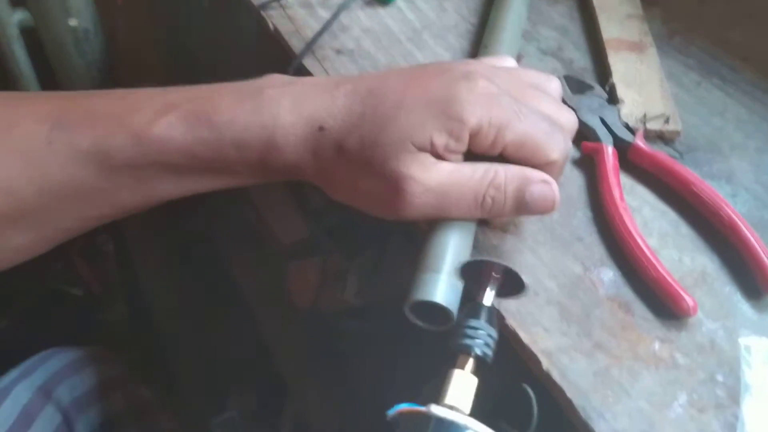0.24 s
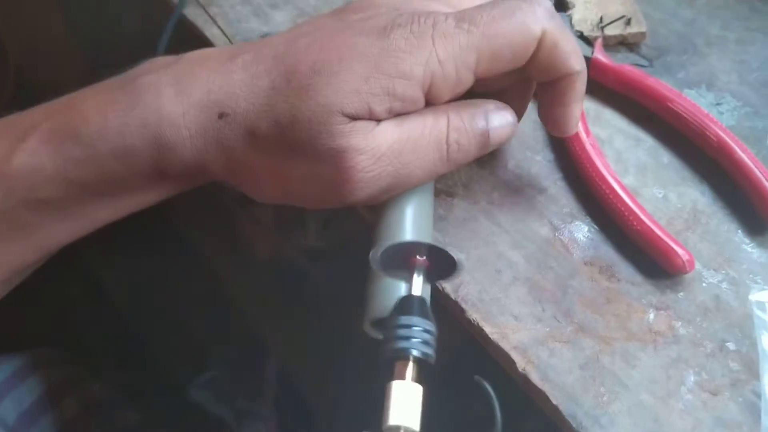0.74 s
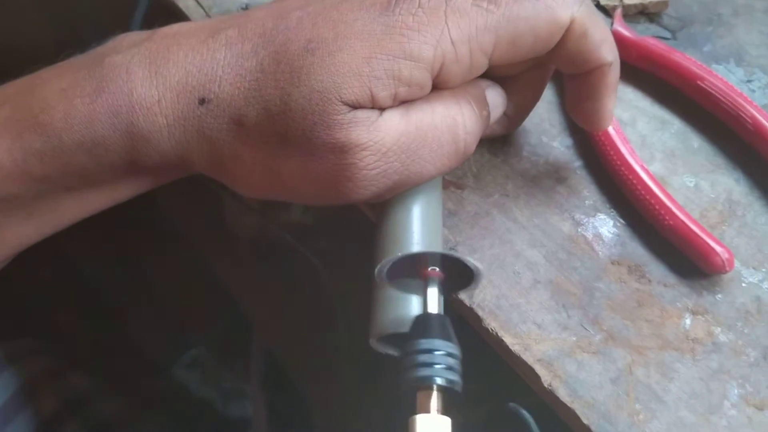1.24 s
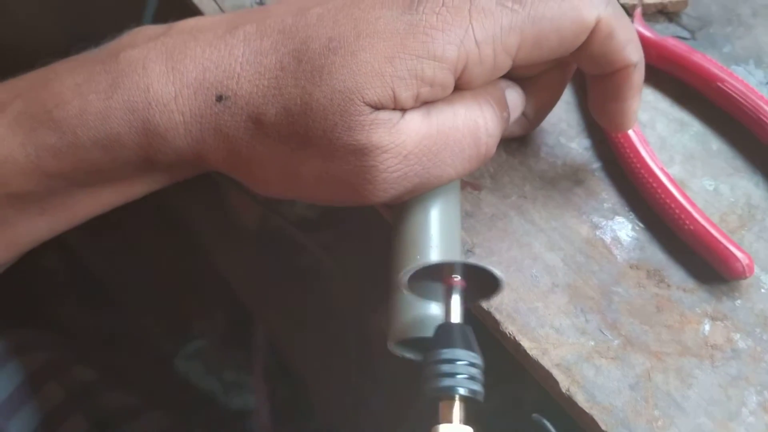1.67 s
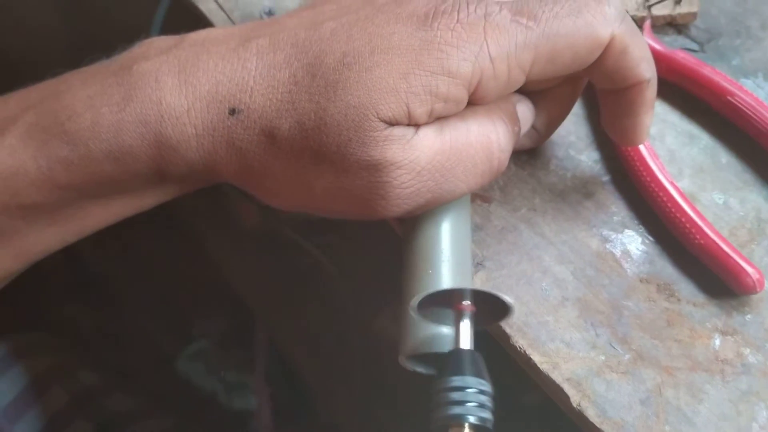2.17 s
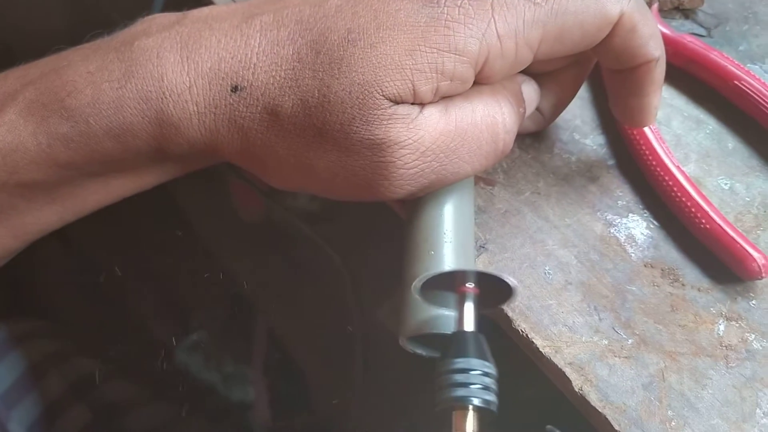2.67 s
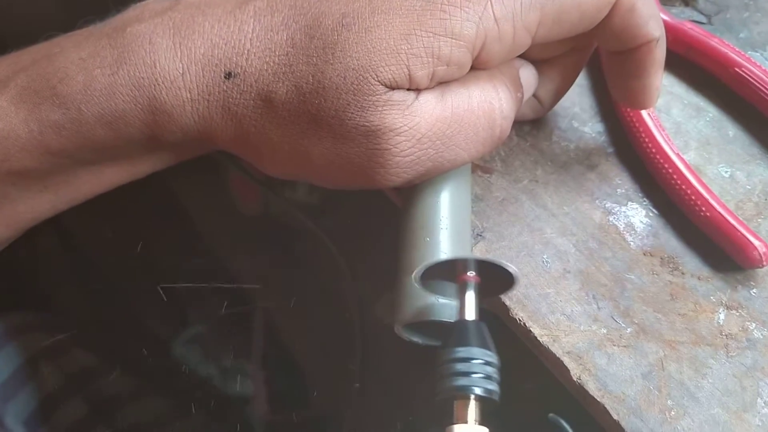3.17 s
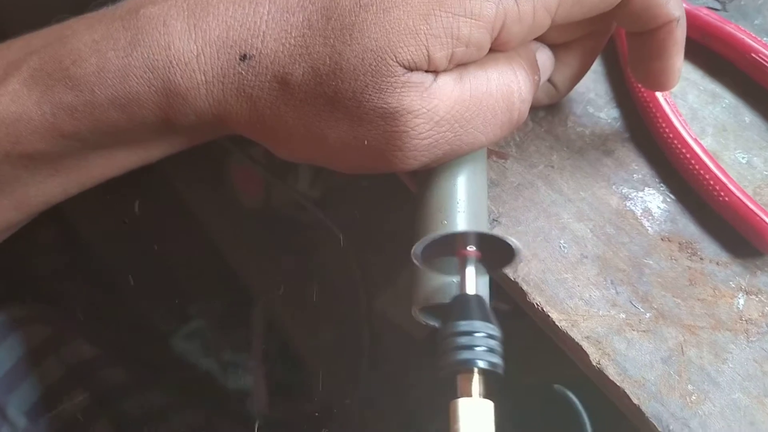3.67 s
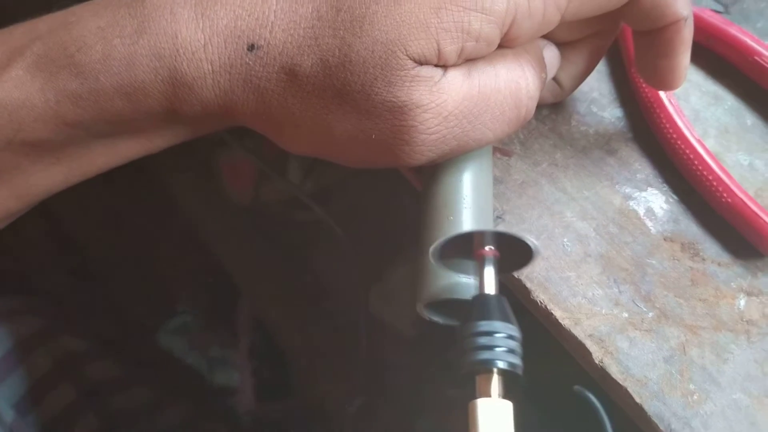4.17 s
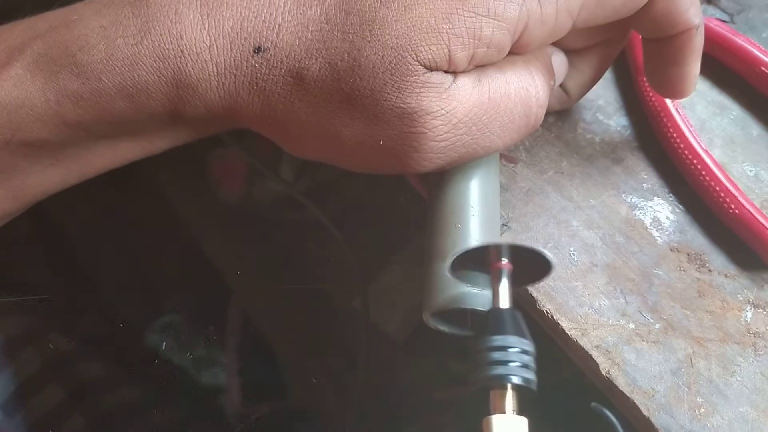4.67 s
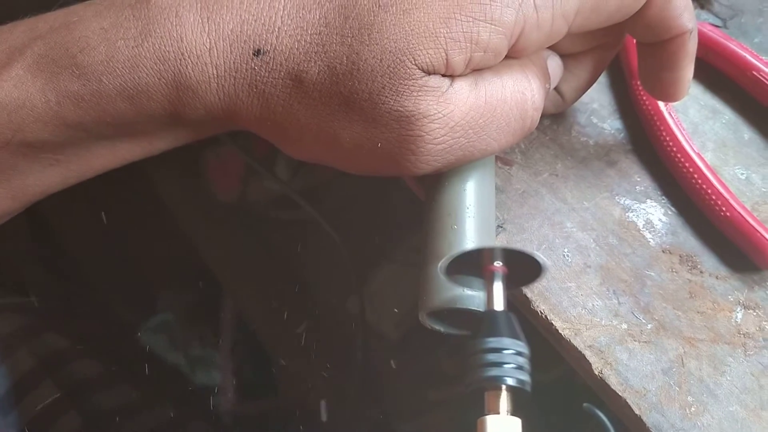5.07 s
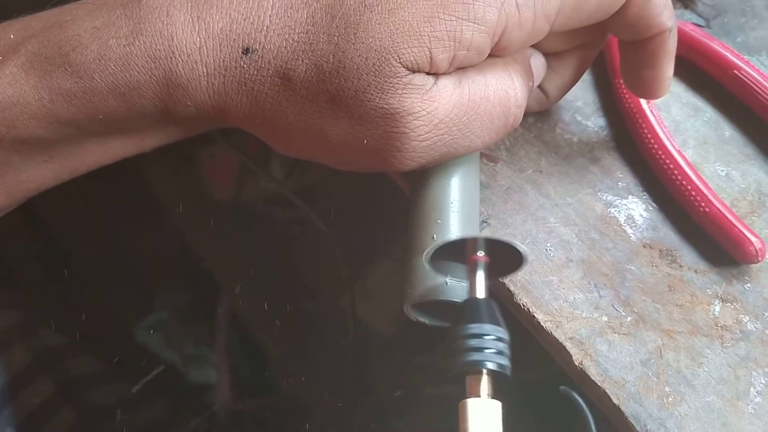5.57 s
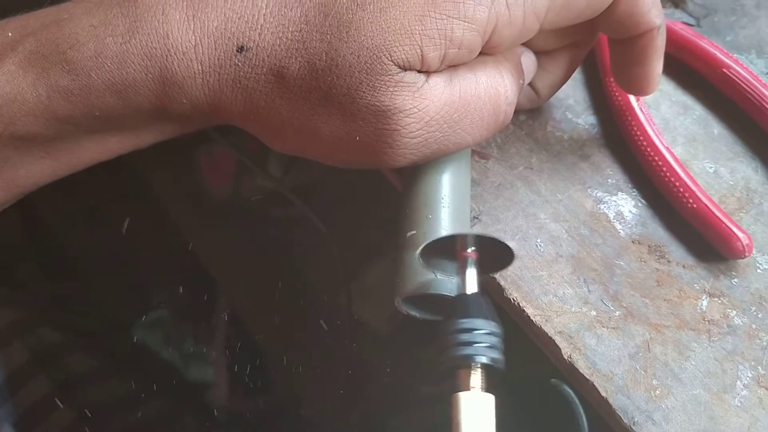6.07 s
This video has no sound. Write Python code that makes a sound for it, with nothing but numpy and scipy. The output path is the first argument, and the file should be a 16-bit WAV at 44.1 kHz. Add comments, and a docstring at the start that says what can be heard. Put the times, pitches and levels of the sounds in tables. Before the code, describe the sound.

A hand-held miniature cutter whirs close to the microphone, hissy and shrill, while a few soft thuds and a sharp tick come from the workbench area. The disc grazes the pipe once, then digs in: rapid once-per-turn strikes fuse into a harsh metallic buzz with a hollow plastic growl. The motor slows and the bites break up. A short free whine follows, then a second rough cut, with short room echo.

```python
"""Steel disc biting a plastic pipe

A small motor spins a thin steel disc that runs out of true, so it bites a plastic pipe once a turn.
Each bite is a sudden strike and a noisy scrape that ring the disc, the shank and the pipe.
The shaft turns slower under load, and on some turns the disc bounces clear.
Between cuts the motor whines freely: steady tones, a rattle and brush hiss.
A hand knocks on the bench of a small workshop, with a low shudder, a lone tick and a faint far tone."""
import sys
import numpy as np
from scipy import signal
from scipy.fft import rfft, irfft, next_fast_len
from scipy.io import wavfile
from scipy.ndimage import uniform_filter1d, minimum_filter1d, map_coordinates

SR = 44100
rng = np.random.default_rng(int(sys.argv[2]) if len(sys.argv) > 2 else 0)


def gain_from_decibels(decibels):
    """Convert decibel values to linear amplitude factors."""
    exponent = np.asarray(decibels, float) / 20
    return 10 ** exponent


def put_to_file(sound):
    """Save the sound as 16-bit audio at rate SR, in the file named by the first command-line argument."""
    columns = np.atleast_2d(sound).T  # one column per channel
    safe = np.clip(columns, -1, 1)
    whole_steps = np.round(safe * 32767)
    wavfile.write(sys.argv[1], SR, whole_steps.astype(np.int16))


N = 279153
T = np.arange(N) / SR  # time in seconds

# shaft speed, lower under load: time_s, speed_turns_per_s
SPEED = [(0.0, 74.79), (2.096, 74.81), (2.499, 72.76), (2.629, 67.09), (2.746, 67.53), (3.131, 55.75),
         (3.256, 43.16), (3.348, 54.66), (3.511, 42.13), (3.581, 63.6), (3.783, 75.34), (4.5, 73.65),
         (4.635, 65.49), (4.729, 65.21), (4.99, 57.5), (5.379, 56.09), (5.451, 68.49), (5.795, 45.65),
         (5.882, 57.46), (6.064, 49.47), (6.159, 62.56), (6.33, 36.03)]
# disc held against the pipe: start_s, end_s
CUTS = [(2.29, 3.725), (4.205, 6.4)]
RUB_DB = -21  # the rest of the rim rubs lightly
RASP_DB = -12  # steady rasp of the rim, felt by shank and pipe


def unit(x):
    """Brings a signal to rms 1."""
    return x / np.sqrt(np.mean(x ** 2) + 1e-20)


def along(points, hz):
    """Reads a curve of (Hz, value) points on a log frequency axis."""
    f, value = np.transpose(points)
    return np.interp(np.log(hz + 1), np.log(f + 1), value)


def wobble(rate):
    """A smooth random curve with rate knots a second."""
    knots = rng.standard_normal(int(N * 2000 / SR))
    return map_coordinates(knots, [T * rate])


def filtered(x, response):
    """Multiplies the spectrum of x by a complex response of frequency."""
    m = next_fast_len(N + SR // 2)
    return irfft(rfft(x, m) * response(np.fft.rfftfreq(m, 1 / SR)), m)[..., :N]


def resonance(f, k, centre_hz, width_hz, db):
    """One resonance peak; neighbours in the list have opposite signs."""
    damping = 1j * f * width_hz
    return (-1) ** k * gain_from_decibels(db) * damping / (centre_hz * centre_hz - f * f + damping)


def ring(x, modes, turn, spread_db, lean_db=0, drift_db=0):
    """Rings x through resonances; each turn drives each one at a new strength, which also drifts."""
    hz, m = np.linspace(0, SR / 2, 4096), next_fast_len(N + SR // 2)
    power = np.mean(abs(sum(resonance(hz, k, *mode) for k, mode in enumerate(modes))) ** 2)
    luck = rng.standard_normal((2, len(modes), turn.max() + 1))
    drift = unit(uniform_filter1d(luck[1], size=15))
    gains = gain_from_decibels(spread_db * luck[0] + drift_db * drift + lean_db)
    f = np.fft.rfftfreq(m, 1 / SR)
    spectrum = sum(rfft(x * gains[k][turn], m) * resonance(f, k, *mode) for k, mode in enumerate(modes))
    return irfft(spectrum, m)[:N] / np.sqrt(power)


def place(x, left_db, lag_s):
    """Pans a source: left is left_db louder than right and hears it lag_s later."""
    gain = gain_from_decibels([[left_db / 2], [-left_db / 2]])
    sides = np.array([[1], [-1]])
    return filtered(x, lambda f: gain * np.exp(-1j * np.pi * f * lag_s * sides))


def air():
    """Workshop background and a lumpy low shudder, both made of noise partly shared by the two sides."""
    # background colour: pitch_hz, relative level_db per Hz
    floor_colour = [(15, -38), (25, -2), (277, -9), (485, -15.5), (1040, -16.5), (1120, -15), (1320, -20),
                    (1460, -21), (2050, -16.5), (3000, -20), (3900, -27), (6600, -120)]
    # moments when the shudder swells into a low thump: time_s, relative level_db
    thumps = [(1.02, -50), (3.0, -50), (3.63, -39), (4.93, -41), (5.48, -37), (6.01, -48)]
    idle_db, cut_db, thump_s = -61, -53, 0.027

    def noise(apart):
        return rng.standard_normal(N) + apart * rng.standard_normal((2, N))

    def low_band(f):
        return (f / 25) ** 2 / (1 + (f / 25) ** 2) / (1 + (f / 70) ** 2)

    floor = gain_from_decibels(-56.5) * unit(filtered(noise(1.0), lambda f: gain_from_decibels(along(floor_colour, f))))
    shudder = unit(filtered(noise(0.48) * gain_from_decibels(1.5 * wobble(14)), low_band))
    busy = sum((T > start) & (T < end) for start, end in CUTS) * 1.0
    busy = uniform_filter1d(busy, size=SR // 5)
    level = gain_from_decibels(idle_db + (cut_db - idle_db) * busy + 1.9 * wobble(7))
    level += sum(gain_from_decibels(db) * np.exp(-((T - s) / thump_s) ** 2) for s, db in thumps)
    return floor + level * shudder * gain_from_decibels([[1.5], [-1.5]])


def room(x):
    """Workshop echo: noise tails whose pitches die at their own speeds, new every third of a second."""
    # how long the echo lasts: pitch_hz, fall by 60 dB_s
    decay = [(200, 0.38), (2000, 0.39), (9000, 0.16)]
    out, step = np.zeros((2, N + 2 * SR)), SR // 3
    for start in range(0, N, step):
        hz, t, z = signal.stft(rng.standard_normal((2, SR // 2)), SR, nperseg=256)
        fading = z * gain_from_decibels(-60 * t / along(decay, hz)[:, None])
        tail = signal.istft(fading, SR, nperseg=256)[1]
        bass = signal.lfilter(*signal.butter(1, 700, fs=SR), tail)
        tail += 0.44 * (bass[::-1] - bass) / 2  # long waves reach both sides more alike
        wet = signal.fftconvolve(x[None, start:start + step], tail / np.linalg.norm(tail[0]), axes=1)
        late = start + 200  # samples
        out[:, late:late + wet.shape[1]] += wet
    return out[:, :N]


def hoot():
    """A faint far tone: one sine whose pitch and level glide from point to point."""
    # time_s, pitch_hz, level_db
    glide = [(3.95, 680, -67), (4.005, 692, -58), (4.01, 791, -52), (4.08, 770, -55), (4.09, 670, -53),
             (4.11, 673, -62), (4.19, 714, -59)]
    s, hz, db = np.transpose(glide)
    level = gain_from_decibels(np.interp(T, s, db, left=-120, right=-120))
    return level * np.sin(2 * np.pi * np.cumsum(np.interp(T, s, hz)) / SR)


def knocks():
    """Dull knocks of hand and pipe on the bench: a sagging thud, its rough body and a short click."""
    # time_s, relative level_db, middle pitch_hz, relative click_db, fall by 60 dB_s
    knock_list = [(0.047, -36.5, 370, -16, 0.32), (0.081, -36, 338, -4, 0.088), (0.473, -44, 330, 4, 0.076),
                  (0.651, -32.5, 753, -8, 0.1), (0.913, -46, 425, -20, 0.27), (.995, -36, 212, 2, 0.11),
                  (1.68, -50, 330, -20, 0.073)]
    out, t = np.zeros(N + SR), np.arange(SR // 4) / SR
    for s, db, hz, click_db, t60 in knock_list:
        noise = rng.standard_normal((2, len(t)))
        # the pitch sags from 1.28 to 0.78 of hz
        thud = np.sin(2 * np.pi * hz * (0.78 * t + 0.0139 * (1 - np.exp(-t / 0.0278))))
        body = signal.lfilter(*signal.butter(1, [hz / 1.27, hz * 1.11], "band", fs=SR), noise[0])
        click = signal.lfilter(*signal.butter(2, [1900, 3100], "band", fs=SR), noise[1])
        blow = 0.51 * thud + 1.03 * unit(body) + gain_from_decibels(click_db + 1.5 - 500 * t) * unit(click)
        swell = 1 - np.exp(-t / 0.0014)
        out[round(s * SR):][:len(t)] += gain_from_decibels(db - 1.5 - 60 * t / t60) * swell * blow
    return out[:N]


def tick():
    """One sharp bright tick of the disc while the tool idles: sines that die within milliseconds."""
    # time_s, fall by 60 dB_s, list of (pitch_hz, relative level_db)
    tick_tones = (0.561, 0.009, [(9200, -25), (7000, -31)])
    s, t60, tones = tick_tones
    t = np.clip(T - s, 0, 1)
    return sum(gain_from_decibels(db - 60 * t / t60) * np.sin(2 * np.pi * hz * t) for hz, db in tones)


def shaft():
    """Angle of the shaft in turns: its speed added up over time."""
    return -0.83 + np.cumsum(np.interp(T, *np.transpose(SPEED))) / SR


def motor(angle):
    """Tones locked to the shaft, a rattle that repeats every turn, and brush hiss gated by the commutator."""
    # level as the tool turns in the hand: time_s, high whine_db, low whine_db
    grip = [(0, -7.5, 0.5), (.5, -7, 1), (1, -2.5, 0), (1.5, -2.5, -0.5), (2.2, -3.5, -1), (3.899, -0.5, 2),
            (4.2, -5, -1.5)]
    # strong tones of the motor: multiple of the shaft speed, relative level_db
    whine = [(1, -70), (3, -74), (15, -66), (19, -79), (20, -73), (21, -78), (25, -77), (30, -74),
             (35, -78), (38, -75), (41, -75), (43, -74), (44, -76), (54, -75), (55, -67), (57, -74),
             (65, -77), (68, -73), (74, -64), (81, -66), (82, -61), (99, -64), (101, -63), (103, -60),
             (104, -61), (107, -63), (109, -60), (110, -50), (111, -56), (112, -55), (113, -62), (115, -61),
             (116, -57), (117, -59), (119, -55), (123, -56), (124, -61), (125, -54), (126, -59), (129, -58),
             (130, -60)]
    # colour of hiss and rattle: pitch_hz, relative level_db per Hz
    brush_colour = [(880, -47), (1500, -28), (1770, -33), (3310, -19), (3600, -25.5), (4160, -16.5),
                    (4630, -22), (9090, -3.5), (10800, -8), (11100, -39), (11600, -9), (12400, -11),
                    (15000, -53)]
    fading_order, fade_s, fade_by_db = 55, 0.57, -10  # one tone sinks as the grip shifts
    s, high_db, low_db = np.transpose(grip)
    high, low = gain_from_decibels(np.interp(T, s, high_db)), gain_from_decibels(np.interp(T, s, low_db))
    speed = np.gradient(angle) * SR
    free = gain_from_decibels(-2 * np.maximum(73.5 - speed, 0))  # the whine sinks as soon as the shaft slows
    fade_db = 1.5 + fade_by_db / (1 + np.exp(np.clip((fade_s - T) / .03, -30, 30)))
    tones = 0
    for order, db in whine:
        level_db = db + 4 + fade_db * (order == fading_order) + 3.2 * wobble(2)
        phase = rng.random() + np.array([[0], [rng.normal(0, .1)]])  # turns, a little apart left and right
        tone = np.sin(2 * np.pi * (order * angle + phase))
        tones = tones + (high if order > 80 else low) * gain_from_decibels(level_db) * tone
    pattern = irfft(rng.standard_normal((2, 210)) + 1j * rng.standard_normal((2, 210)), 4096)
    rattle = pattern[:, (angle % 1 * 4096).astype(int)]
    once_twice = np.cos(2 * np.pi * angle) + np.cos(4 * np.pi * angle + 1)
    gate = gain_from_decibels(0.23 * once_twice + 1.7 * np.cos(10 * np.pi * angle))  # swells five times a turn

    def colour(x):
        return unit(filtered(gate * x, lambda f: gain_from_decibels(along(brush_colour, f))))

    hiss = colour(rng.standard_normal((2, N)) + 0.057 * rng.standard_normal(N))
    mix = free * colour(rattle + .6 * rattle[::-1]) + gain_from_decibels(-.5) * hiss
    treble = filtered(mix, lambda f: 1 / (1 + (5800 / (f + 1)) ** 6))
    noise = gain_from_decibels(-41.0) * (high * treble + low * (mix - treble))
    return (free * tones + noise) * gain_from_decibels([[2.2], [-2.2]])


def bites(angle):
    """Once a turn the high side of the disc strikes the pipe, scrapes and lets go: the forces, turn by turn."""
    # how hard it works: time_s, relative disc_db, shank_db, pipe_db
    feed = [(2.291, -14.5, -17, -23.5), (2.32, -17, -31.5, -26), (2.35, -18, -33.5, -40.5),
            (2.41, -16, -37, -31), (2.45, -16, -35, -35.5), (2.475, -17, -30.5, -27.5),
            (2.58, -12.5, -21.5, -25), (2.66, -13, -24.5, -30), (2.88, -13, -26, -27.5),
            (3.25, -11.5, -23, -24.5), (3.5, -15, -21, -24.5), (3.648, -14.5, -31, -34.5),
            (3.72, -24, -50, -68), (4.2, -15.5, -27, -40), (4.3, -15, -38, -39), (4.345, -28, -51, -67),
            (4.384, -36.5, -47, -61), (4.4, -14, -38.5, -43), (4.52, -15.5, -27.5, -26.5),
            (4.88, -12, -31.5, -28.5), (5.03, -11, -30, -32), (5.25, -11, -29.5, -26),
            (5.45, -10.5, -30, -29.5), (5.57, -11.5, -27, -23.5), (5.9, -13, -24, -25.5),
            (6.12, -14, -29, -30), (6.18, -15.5, -31.5, -35.5), (6.33, -11, -25.5, -26.5)]
    # turns on which the disc lands suddenly: time_s, bite level_db, share of the turn in contact
    slams = [(2.295, -1.5, 0.19), (3.339, -4, 0.36), (3.365, -1.5, 0.39), (3.421, 0.5, 0.37),
             (3.466, 0.5, 0.25), (3.506, 3.5, 0.37), (3.547, 4.5, 0.23), (3.598, 1.5, .08),
             (3.643, 5.5, 0.24), (4.21, -0.5, .1), (4.401, -3.5, 0.12), (5.814, 0, .07),
             (5.856, 1.5, 0.072), (5.906, 0.5, 0.53), (5.965, -2, 0.071), (6.003, 0, 0.096),
             (6.095, 2, 0.11), (6.118, -3.5, .06), (6.164, 0, .3), (6.222, 1, 0.34), (6.285, -1, .1)]
    # single turns with a set bite, from full or weaker to bounced clear of the pipe: time_s, bite level_db
    skips = [(2.448, -3), (3.329, -32), (3.404, -37), (3.445, -36), (3.488, -26), (3.53, -29), (3.584, -10),
             (3.632, 0), (3.704, 0), (4.673, -3), (4.78, -5), (5.382, -8), (5.462, -6), (5.89, -32),
             (6.081, -15), (6.151, -24), (6.203, -35)]
    # touches of three turns: middle time_s, relative disc_db, shank_db, pipe_db, first graze_db
    taps = [(1.895, -8.5, -23.5, -27, -8.5), (3.786, -10, -28.5, -30.5, -9)]
    # as the groove deepens: time_s, pipe tilt_db per octave, deeper bite of every other turn_db (sign: which)
    groove = [(2.3, 1, 0), (2.5, 4, 0), (2.6, 0, 0), (2.65, -2, 2.5), (2.85, -1, 2.5), (3.07, -1, 2),
              (3.15, -1, .5), (3.32, -1, 1), (3.35, -1, 4), (3.39, -1, 4), (3.42, 0, 1), (3.6, 0, 0),
              (4.45, 4, 0), (4.6, 2, 0), (4.69, 1, 0), (4.71, 0, -3), (4.8, 0, -2.5), (4.84, 0, 3),
              (4.98, -1, 3), (5.02, -1, -.5), (5.46, -1, 0), (5.5, -1, 2), (5.57, -1, 2), (5.62, -1, 0),
              (5.79, -1, 0), (5.82, 0, -4), (6.01, 0, -4), (6.14, 0, -2.5), (6.2, 0, 3), (6.33, 0, 3)]
    turn = np.floor(angle + .5).astype(int) + 1
    luck = rng.standard_normal((turn.max() + 1, 5))
    middle_s = np.interp(np.arange(len(luck)) - 1, angle, T)

    def nearest(s):
        return np.argmin(abs(middle_s - s))

    s, *levels = np.transpose(feed)
    disc_db, shank_db, pipe_db = (np.interp(middle_s, s, c) for c in levels)
    # turns per second below the free 75: more slowing means a deeper cut
    slowing = np.maximum(75 - np.interp(middle_s, *np.transpose(SPEED)), 0)
    touching = sum((middle_s > start) & (middle_s < end) for start, end in CUTS)
    bite_db = (.5 + .04 * slowing) * luck[:, 0]
    dig_free = 0.0028
    dig = dig_free + 0.0015 * slowing  # turns the edge takes to dig in
    share = (0.22 + 0.0035 * slowing) * gain_from_decibels(1.4 * luck[:, 1])  # share of the turn in contact
    share = np.clip(share, .02, .7)
    lead = .23 + (0.003 + 0.0022 * slowing) * luck[:, 2]  # turns from first touch to the middle of the turn
    soften_db = -0.1 * slowing  # a deep cut cushions the first touch
    for s, level_db, contact in slams:
        k = nearest(s + .003)  # look for the middle of the turn a little after its first touch
        lead[k] = k - 1 - np.interp(s, T, angle)
        bite_db[k], share[k], dig[k], soften_db[k] = level_db, contact, dig_free, soften_db[k] / 3
        glance_db = -7 * (contact < .1)  # a short glancing landing moves shank and pipe less
        shank_db[k], pipe_db[k] = shank_db[k] + glance_db, pipe_db[k] + glance_db
    for s, level_db in skips:
        bite_db[nearest(s)] = level_db
    for s, *tap_db, graze_db in taps:
        three = slice(nearest(s) - 1, nearest(s) + 2)
        touching[three], share[three] = 1, 0.037
        disc_db[three], shank_db[three], pipe_db[three] = tap_db
        bite_db[three] = graze_db, 0, -28  # the turns before and after only graze
    since = angle - (turn - 1) + lead[turn]  # turns since the edge met the wall
    rise = np.clip(since / dig[turn], 0, 1)
    release = gain_from_decibels(-110 * np.clip(since - share[turn], 0, 1) - 6.7 * since)
    press = (touching * gain_from_decibels(bite_db) / np.sqrt(share + 0.12))[turn]
    load = (release + gain_from_decibels(RUB_DB)) * press
    sudden = np.diff(np.clip(since / 0.014, 0, 1) * load, prepend=0)
    s, tilt_db, alternate_db = np.transpose(groove)
    return dict(
        turn=turn, slowing=slowing, soften_db=soften_db, press=press, hold=rise * release,
        strike=np.maximum(sudden, 0) * gain_from_decibels(soften_db[turn]),  # the sudden load at first touch
        drag=gain_from_decibels(12.3 * np.clip(since, 0, .35) - 1.5),  # the pull on shank and pipe lasts through the bite
        disc_db=disc_db, shank_db=shank_db, pipe_db=pipe_db, shank_luck=luck[:, 3], pipe_luck=luck[:, 4],
        tilt_db=np.interp(middle_s, s, tilt_db),
        deeper_db=np.interp(middle_s, s, alternate_db) * (-1) ** np.arange(len(luck)))


def scrape(bite, spiky_db, rub_db):
    """Friction noise, spikier with spiky_db, that follows the bite over a steady rub."""
    spiky = rng.standard_normal(N) * gain_from_decibels(spiky_db * rng.standard_normal(N))
    return (bite["hold"] + gain_from_decibels(rub_db)) * bite["press"] * unit(spiky)


def pipe_sound(bite):
    """The hand-held pipe answers a little later, with a growl at the shaft speed."""
    # resonances: pitch_hz, width_hz, relative level_db
    pipe_modes = [(151, 54, -16), (217, 6.9, -4), (350, 41, -0.5), (406.5, 8.2, 2.5), (455.6, 26.6, -4.5),
                  (552.7, 19.4, -1), (770, 145, -2.5), (945, 32, 1), (1057, 78, 1), (1252, 73, 3.5),
                  (1565, 430, -4.5)]
    turn = bite["turn"]
    growl = (54.2 + 0.65 * bite["slowing"])[turn] * bite["strike"]  # heavier in a deep cut
    growl = filtered(growl, lambda f: 1 / (1 + 1j * f / 870))  # the plastic yields above 870 Hz
    blow = 1.2 * bite["drag"] * scrape(bite, 0.91, RASP_DB) + growl
    level_db = bite["pipe_db"] + 1.25 * bite["deeper_db"] + 1.33 * bite["pipe_luck"]
    tilt_db = np.log2(np.array(pipe_modes)[:, :1] / 700) * bite["tilt_db"]
    pipe = ring(blow * gain_from_decibels(level_db[turn]), pipe_modes, turn, 0.57, tilt_db, drift_db=2.0)
    pipe = filtered(pipe, lambda f: (1j * f / (1j * f + 110)) ** 2)
    return gain_from_decibels(-9.5) * np.pad(pipe, (60, 0))[:N]


def shank_sound(bite):
    """The shank rings from the drag of the scrape and from each strike."""
    # resonances: pitch_hz, width_hz, relative level_db
    shank_modes = [(1853, 290, -6), (2387, 138, 3.5), (2810, 274, 2), (3850, 150, -9)]
    turn = bite["turn"]
    level_db = bite["shank_db"] + 1.4 * bite["deeper_db"] + 1.5 * bite["shank_luck"]
    blow = bite["drag"] * scrape(bite, 0.45, RASP_DB) + 0.6 * bite["strike"]
    shank = ring(blow * gain_from_decibels(level_db[turn]), shank_modes, turn, 2.2, drift_db=2.5)
    return gain_from_decibels(-4.5) * np.pad(shank, (30, 0))[:N]


def disc_sound(bite):
    """The steel disc rings brightly from strike and chattering scrape, with a broad crack at first touch."""
    # resonances: pitch_hz, width_hz, relative level_db
    disc_modes = [(4140, 173, -21.5), (4870, 260, -22.5), (5140, 420, -24.5), (6540, 64, -20),
                  (7030, 1280, -15.5), (7780, 150, -19.5), (7750, 32, -5.5), (8312, 233, 7),
                  (8180, 91, 0.5), (8430, 180, -0.5), (9070, 52, 1.5), (9220, 167, -5), (11650, 51, -7),
                  (12300, 140, -24.5), (15200, 210, -24)]
    # the part that differs between left and right: pitch_hz, relative level_db
    apart = [(3000, -0.5), (5000, 13.5), (7500, -9), (9000, -4), (11000, 8.5), (15000, -10)]
    turn, slowing, strike = bite["turn"], bite["slowing"], bite["strike"]
    chatter_db = np.clip(1 - .3 * bite["soften_db"], 0, 3.8)[turn]  # the deeper the cut, the rougher
    chatter = gain_from_decibels(chatter_db * wobble(380) - .115 * chatter_db ** 2)
    # a deep cut damps the modes just under 8330 Hz and frees those just above: 0.23 dB per turn/s of slowing
    offset_hz = np.array(disc_modes)[:, :1] - 8330
    lean_db = 0.23 * (slowing - 10) * np.sign(offset_hz) * (abs(offset_hz) < 400)
    lean_db = lean_db + bite["deeper_db"] * (offset_hz < -1500)
    come_and_go = unit(uniform_filter1d(rng.standard_normal((len(disc_modes), len(slowing))), size=4))
    lean_db = lean_db + 4 * (offset_hz > 2500) * come_and_go  # the highest modes
    level = gain_from_decibels(bite["disc_db"][turn])

    def struck():
        blow = chatter * scrape(bite, 0.41, RUB_DB) + 20 * strike
        return ring(blow * level, disc_modes, turn, 1.1, lean_db, drift_db=.9)

    def crack_band(f):
        return (1j * f / (1j * f + 2500)) ** 2 / (1 + 1j * f / 7000) ** 2

    shared, lobes = struck(), filtered(struck(), lambda f: gain_from_decibels(along(apart, f)))
    crack = filtered(gain_from_decibels(11.5) * level * strike * rng.standard_normal(N), crack_band)
    shared = shared + crack
    return gain_from_decibels(1.0) * np.array([shared + lobes, shared - 0.69 * lobes])


def scene():
    """Tool and pipe close to the microphone, in the room."""
    angle = shaft()
    bite = bites(angle)
    disc, shank, pipe = disc_sound(bite), shank_sound(bite), pipe_sound(bite)
    bench = knocks()
    direct = disc * gain_from_decibels([[.3], [-.3]]) + place(shank, 11.4, 0.001035) + place(pipe + bench, 2.4, 1e-4)
    spill = gain_from_decibels(-10.5) * disc[0]  # the treble beams forward and stirs the room little
    wet = room(spill + gain_from_decibels(-8.5) * shank + gain_from_decibels(-4.0) * pipe + gain_from_decibels(-6) * bench)
    return direct + wet + motor(angle) + hoot() + tick() * gain_from_decibels([[2], [-2]]) + air()


def limited(x, top):
    """A fast limiter: the gain needed, held over a short look-ahead and smoothed."""
    need = np.minimum(1, top / (abs(x).max(axis=0) + 1e-9))
    return x * uniform_filter1d(minimum_filter1d(need, size=61), size=61)


def top_cut(x):
    """Nothing passes above the cut-off."""
    return signal.sosfilt(signal.butter(12, 15940, fs=SR, output="sos"), x)


def record(dry):
    """The microphone loses the top treble; a limiter holds the loudest bites."""
    # microphone treble: pitch_hz, gain_db
    mic_treble = [(6000, -1.5), (9500, -2.5), (10800, -14.5), (13000, -11), (16000, -32)]
    heard = filtered(dry, lambda f: gain_from_decibels(along(mic_treble, f)))
    return top_cut(limited(heard, top=0.97))


dry = scene()
out = record(dry)
put_to_file(out)
```